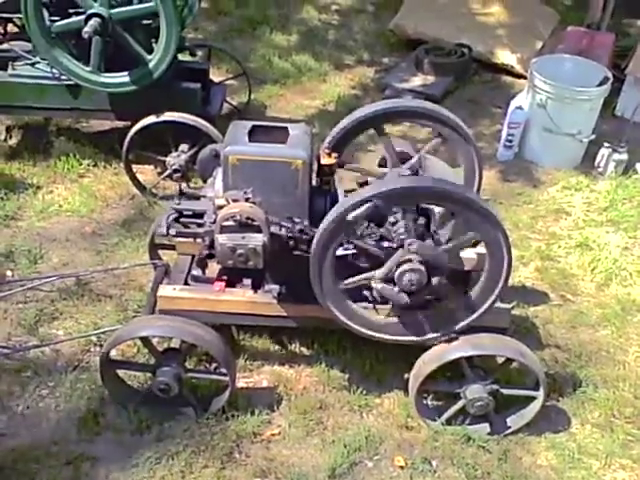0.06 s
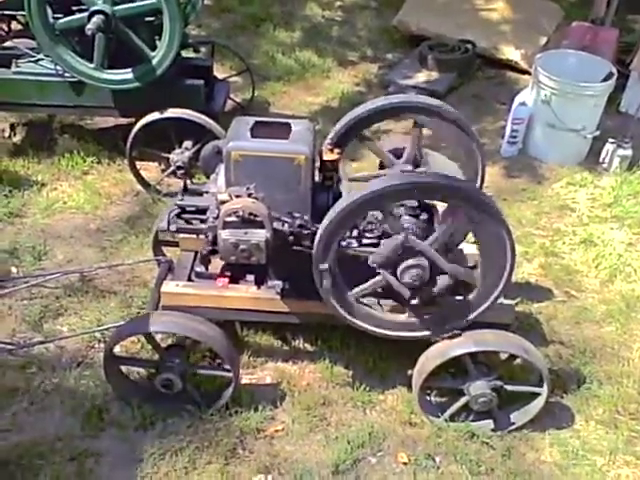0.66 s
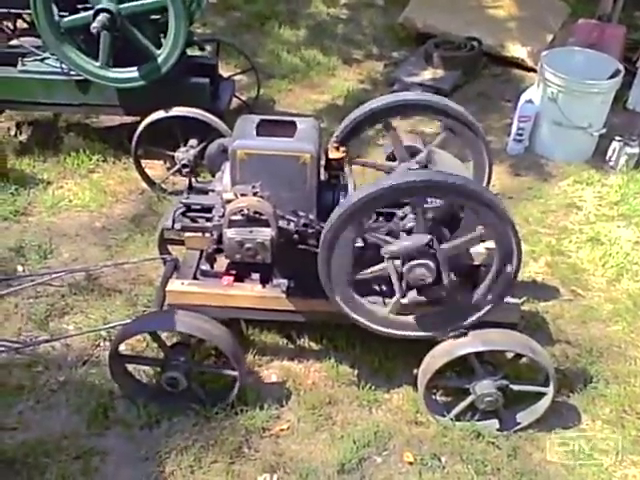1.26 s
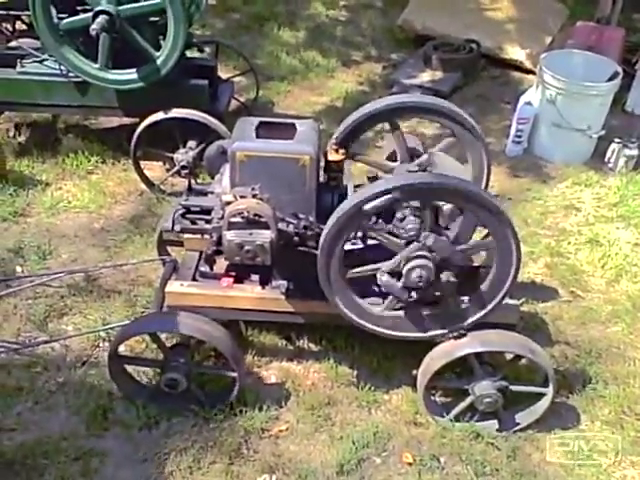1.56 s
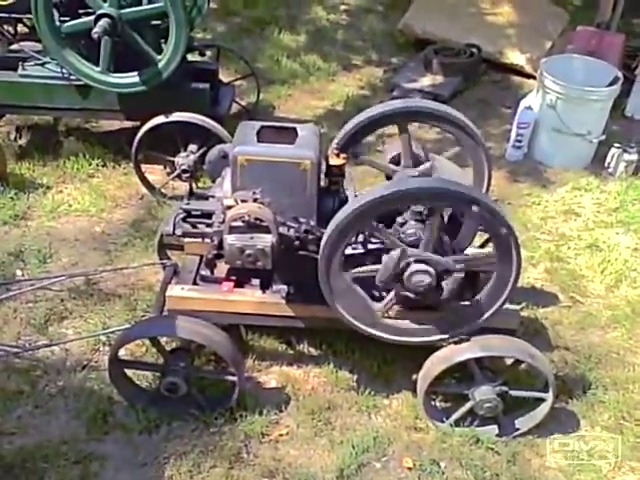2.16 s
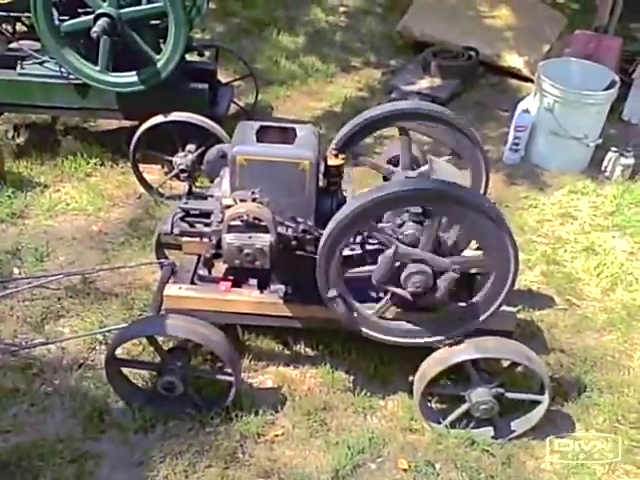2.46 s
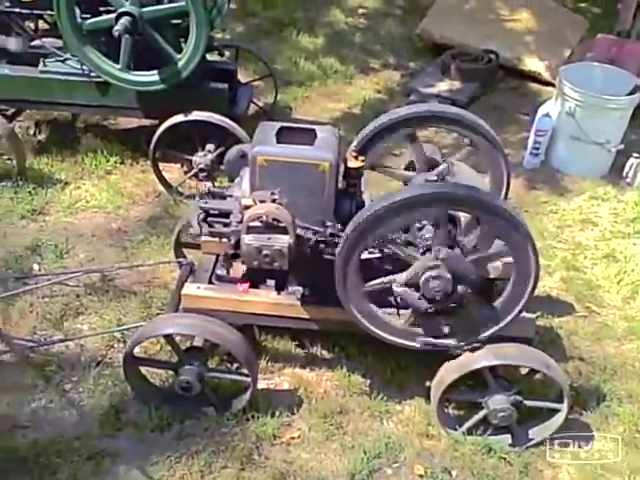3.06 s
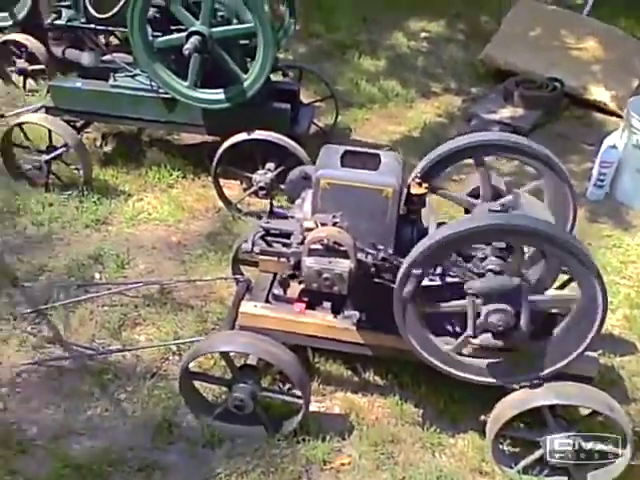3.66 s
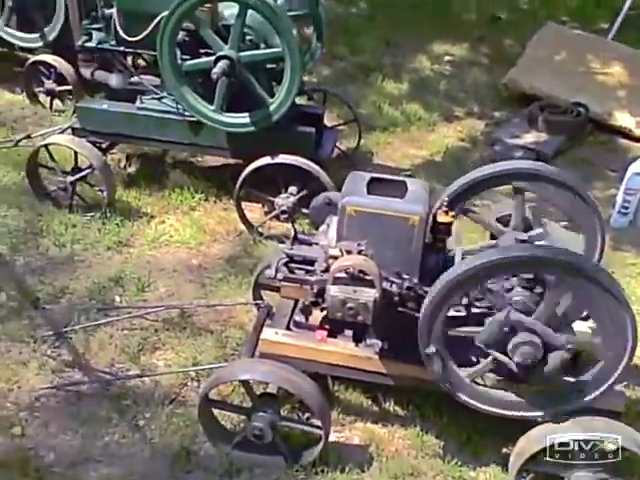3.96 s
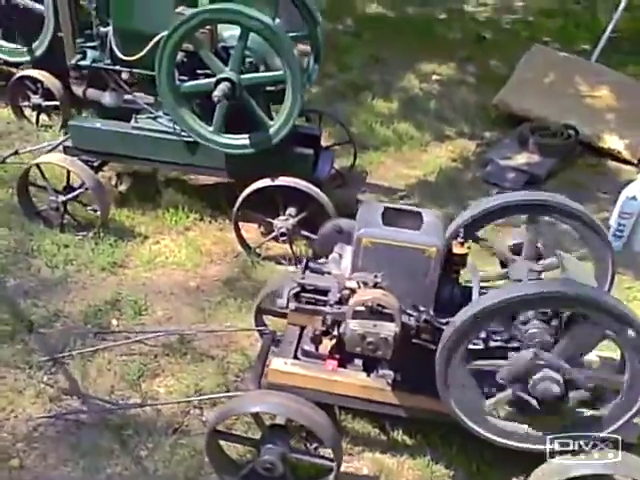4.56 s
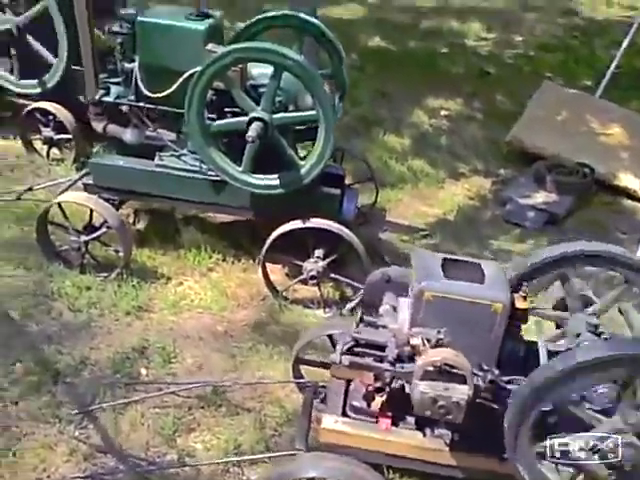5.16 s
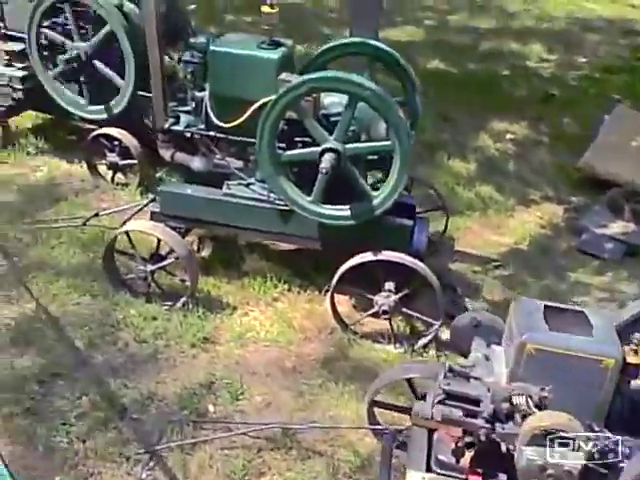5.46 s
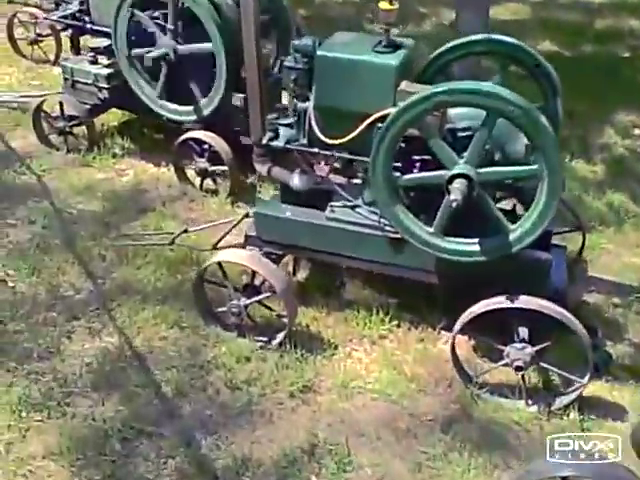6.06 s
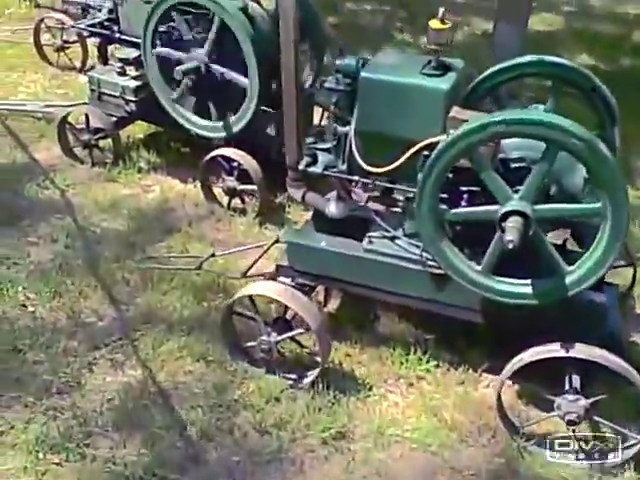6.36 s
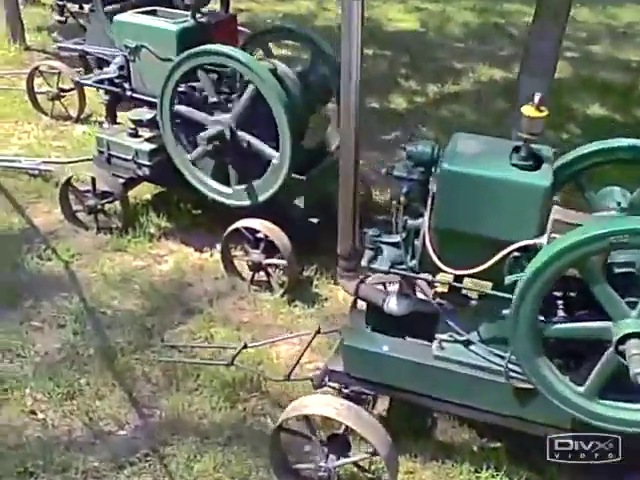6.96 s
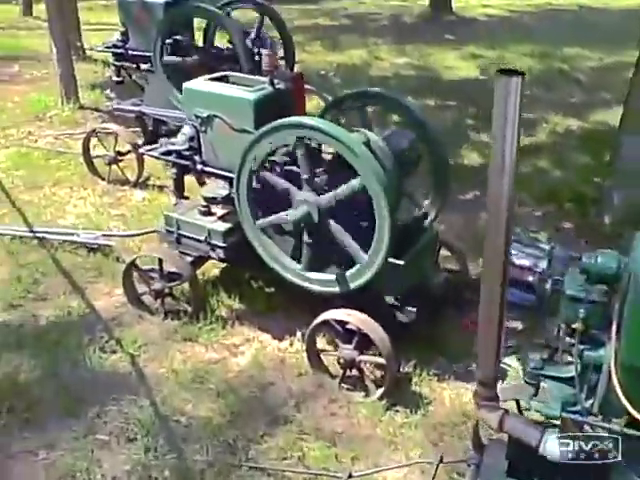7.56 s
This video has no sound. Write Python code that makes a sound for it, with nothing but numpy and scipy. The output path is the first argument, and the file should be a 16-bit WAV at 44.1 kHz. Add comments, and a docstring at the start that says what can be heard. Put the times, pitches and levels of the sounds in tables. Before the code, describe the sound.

Rapid exhaust popping from an antique gas engine runs on with brief hitches, among occasional deep chuffs and clacking iron parts.

```python
"""Antique gas engines at a show.

A fast engine fires 13 times a second, each pulse of gas exciting the resonances of a small muffler,
in runs that its governor mostly ends with a few weak firings. Slow hit-and-miss engines chuff between
the pops, their valves hiss and their gear clacks. More engines rumble behind; once a sharp click sounds."""
import sys
import numpy as np
from scipy import signal
from scipy.fft import rfft, irfft, next_fast_len
from scipy.io import wavfile
from scipy.ndimage import map_coordinates

SR = 44100
rng = np.random.default_rng(int(sys.argv[2]) if len(sys.argv) > 2 else 0)


def master(y):
    """Save y as 16-bit WAV."""
    cut = np.clip(np.atleast_2d(y).T, -1, 1)
    pcm = np.round(cut * 32767)  # scale
    wavfile.write(sys.argv[1], SR, pcm.astype(np.int16))


N = 344862
EVENT_T = np.arange(int(.09 * SR)) / SR  # time axis of one transient, t/s
CLICK_S = 4.1522

# firings of the slow engines: t/s, thump level/dB, puff level/dB, intake lead/s, intake level/dB
CHUFFS = [(0.43, -26.5, -35.5, 0.16, -35), (0.853, -17, -22, 0.16, -33), (3.191, -25, -43.5, .18, -40),
          (3.406, -18, -22, .175, -30.5), (3.64, -18, -24.5, .163, -33), (5.760, -27, -35, 0.19, -49),
          (6.266, -22.5, -29, .084, -31), (6.604, -18.5, -21.5, .168, -35)]
# mid-range spectrum of machinery noise: f/Hz, level/dB
DIN_SPECTRUM = [(130, -36), (260, -9), (350, -2), (393, 0.5), (450, -2), (670, 0.5), (1020, -2),
                (1240, 2.5), (1500, -0.5), (1750, -11.5), (2400, -14.5), (4000, -54.5)]
# treble spectrum of machinery noise: f/Hz, level/dB
HISS_SPECTRUM = [(1000, -47.5), (1900, -8.5), (2600, 0.5), (3000, -2), (3220, 1), (3400, 1.5), (3650, 5),
                 (4050, -3.5), (4500, -4.5), (4800, -7), (5100, -5), (5500, -13), (6500, -13.5)]


def fast_engine():
    """Source and filter: each exhaust pulse is a shock, a gas slug and a jet, ringing pipe and muffler."""
    # the listener's path: t/s, lag of the ground reflection/s, turn (0 muffler's face, 1 its side)
    stance = [(0, 0.002257, 0), (3.801, 0.002257, 0.069), (4.8, 0.002257, 0.31), (5.5, 0.0021, 0.49),
              (6.0, .00202, 0.81), (6.5, .0019, 0.6), (7.0, .00172, 0.8), (7.8, .00168, 0.8)]
    # the pipe's ring, fading as the listener walks away: t/s, level/dB
    pipe_levels = [(0, -18), (3.9, -17.5), (4.9, -18.4), (5.6, -20), (6.5, -22.5), (7.1, -25), (7.8, -30)]
    # the muffler's two lowest shell modes: f/Hz, bandwidth/Hz, gain/dB
    shell_modes = [(793, 21, -1.5), (949, 27, -5.5)]
    out = np.zeros(N)
    for t, db, throttle_db, rasp_db, hardness_db, bark_hz in firings():
        lag, turn = at(stance, t)
        ring_db = at(pipe_levels, t)[0] + db - throttle_db
        bark_db = hardness_db + db - throttle_db
        # throttling weakens the thump least and the rasp most
        thump = amp(db - 21.5 - .4 * throttle_db) * gas_slug(centre_s=.0054, width_s=.0022)
        pipe = pipe_ring(start_hz=151.3, end_hz=737.5, glide_s=.023, peak_s=.0092, sharp=7.8)
        ring = amp(ring_db - .5) * burst(ground_echo(pipe, lag, share=.57 * turn))
        shock = valve_crack(hz=980, t60=.0027)
        crack = amp(bark_db - 7) * burst(ground_echo(shock, lag, share=.4))
        bark = amp(bark_db - .5) * muffler_bark(bark_hz, lag, turn)
        shell = amp(bark_db - 16) * (1 - turn) * burst(resonate(crack, shell_modes))
        rasp = amp(rasp_db + db - 1.48 * throttle_db) * jet_rasp(lag, turn)
        unbroken = (t > CLICK_S) | (t + EVENT_T < CLICK_S)  # the pop under way breaks off at the click
        add(out, t, unbroken * (thump + ring + crack + bark + shell + rasp))
    return out


def firings():
    """Cycle-to-cycle variation: a run of uneven pops quickens throughout and mostly ends in weaker ones."""
    # runs: t/s, full firings, throttled firings, period offset/s, level/dB, rasp level/dB,
    # loss per throttled firing/dB, bark level/dB, bark f/Hz
    runs = [(0.0132, 9, 1, -.00015, 0.24, -25, 10.5, -18, 1334),
            (0.7714, 2, 1, -0.00011, 0, -30, 3.5, -19.5, 1296),
            (1.0023, 5, 1, -0.00035, -1, -26.5, 6, -18.5, 1354),
            (1.4616, 7, 4, 0.00032, 0.13, -24.5, 4, -18.5, 1253),
            (2.3043, 7, 1, 0.0013, 0.9, -25, 4.5, -19.5, 1333),
            (2.919, 5, 1, -.0005, -0.14, -28.5, 10.5, -18, 1356),
            (3.3762, 1, 1, -.001, -2.5, -32.5, 8.5, -22, 1190),
            (3.5299, 9, 0, .0009, 0, -26.5, 0, -18, 1440),
            (4.1987, 1, 3, -0.00098, -2, -27.5, 3, -18.5, 1520),
            (4.5064, 8, 3, .00005, -0.47, -28.5, 4.5, -19.5, 1520),
            (5.3471, 10, 2, 0.00081, -0.5, -28, 5, -20, 1420),
            (6.4238, 7, 1, -0.000084, -0.5, -24, 15, -20, 1150),
            (7.0329, 1, 2, -.0002, 0.5, -25, 14.5, -23, 1400),
            (7.2657, 8, 0, 0.0017, 0, -24.5, 0, -23, 1340)]
    period_s, speedup_s = .077, .00035  # each firing shortens the period
    for start, full, throttled, offset_s, db, rasp_db, loss_db, bark_db, bark_hz in runs:
        for k in range(round(full) + round(throttled)):
            t = start + k * (period_s + offset_s) - speedup_s * k * (k - 1) / 2
            throttle_db = loss_db * max(k + 1 - round(full), 0)
            kick = np.exp(-k / 2.3)  # a run opens on a full charge
            charge, turbulence, hardness, heat = rng.standard_normal(4)
            yield (t, db + .54 * charge, throttle_db,
                   rasp_db + 5.5 * kick + 1.6 * turbulence,
                   bark_db + kick + .75 * hardness,
                   bark_hz * np.exp(.06 * heat))


def gas_slug(centre_s, width_s):
    """Monopole radiation: a slug of gas sends out a pressure hump between two dips."""
    u = (EVENT_T - centre_s) / width_s
    return burst((1 - u * u) * np.exp(-u * u / 2))


def pipe_ring(start_hz, end_hz, glide_s, peak_s, sharp):
    """Air-column resonance: the pipe's lowest mode climbs as the flow dies down."""
    glide = end_hz - (end_hz - start_hz) * np.exp(-EVENT_T / glide_s)
    hz = glide * (1 + .03 * rng.standard_normal())
    return burst(np.sin(2 * np.pi * np.cumsum(hz) / SR) * swell(peak_s, sharp))


def valve_crack(hz, t60):
    """Sudden pressure release: a damped shock as the exhaust valve leaves its seat."""
    return burst(-np.sin(2 * np.pi * hz * EVENT_T) * amp(-60 * EVENT_T / t60))


def muffler_bark(bark_hz, lag, turn):
    """Forced resonance: turbulent flow drives the muffler's modes."""
    # the muffler's response: f/Hz, face level/dB, side level/dB
    response = [(300, -44, -23.5), (457, -4.5, -4), (610, -14.5, -0.5), (726, -1.5, -13), (911, -6, 9),
                (973, -20.5, 3), (1124, 7.5, -1.5), (1288, -6, 2), (1386, 0, -1), (1577, 5, -2.5),
                (1647, -19, -2.5), (2060, -20, -2.5), (2930, -50.5, -56)]
    flow = jet(peak_s=.0025, rise_s=.0011, decay_s=.0021) * rng.standard_normal(len(EVENT_T))
    # heard from the face, the strongest mode shifts with the heat of the gas
    mode_db = 7 + 1.5 * rng.standard_normal()
    flow += (1 - turn) * resonate(flow, [(bark_hz, 190, mode_db)])
    bark = coloured(flow, heard_from(response, turn))
    return burst(ground_echo(bark, lag, share=.63))


def jet_rasp(lag, turn):
    """Jet noise: the fastest turbulence radiates treble straight from the outlet."""
    # the jet's spectrum: f/Hz, face level/dB, side level/dB
    spectrum = [(1100, -22.5, -39), (2010, -2, 2), (2010, -5, -3.5), (2290, -1.5, -2), (2620, 4, -1.5),
                (2900, -2.5, -2), (3260, 4, 1.5), (3610, 1, 1), (4050, -8, -2.5), (4540, -6.5, -17.5),
                (4780, -5, -12.5), (5580, -13.5, -14), (6240, -15, -14)]
    spray = jet(peak_s=.0026, rise_s=.00045, decay_s=.0043) * rng.standard_normal(len(EVENT_T))
    rasp = coloured(spray, heard_from(spectrum, turn ** 2))
    return burst(ground_echo(rasp, lag, share=.063))


def slow_engines():
    """Pulse length sets pitch: a big slow cylinder lets out a longer, deeper slug and a soft puff."""
    # the escaping gas: f/Hz, level/dB
    puff_spectrum = [(150, -28.5), (400, -3), (560, -4), (700, 3.5), (800, -10.5), (900, -1), (1050, -2.5),
                     (1400, -6), (2000, -16.5), (3600, -8), (5500, -22.5)]
    out = np.zeros(N)
    onset = 1 - np.exp(-EVENT_T / .00034)
    for t, thump_db, puff_db, _, _ in CHUFFS:
        thump = amp(thump_db + 1.5) * gas_slug(centre_s=.0105, width_s=.0055) * onset
        puff = burst(jet(peak_s=.009, rise_s=.024, decay_s=.011) * noise(puff_spectrum, len(EVENT_T)))
        crack = amp(-5) * valve_crack(hz=440, t60=.012)
        add(out, t, thump + amp(puff_db) * (puff + exhaust_ring() + crack))
    return out


def exhaust_ring():
    """Free decay: a slow engine's exhaust rings on after a chuff."""
    # exhaust resonance: f/Hz, t60/s, level/dB
    modes = [(800, .06, -3.5)]
    onset = 1 - np.exp(-EVENT_T / .004)
    return sum(amp(db) * burst(np.sin(2 * np.pi * hz * EVENT_T) * amp(-60 * EVENT_T / t60) * onset)
               for hz, t60, db in modes)


def valves():
    """Turbulence at a constriction: air rushes through valves, before each chuff and at other times."""
    # other rushes of air: t/s (each rush opens half a length earlier and peaks half a length later), nominal
    # length/s, body level/dB, hiss level/dB
    rushes = [(0.173, 0.049, -30.5, -33.5), (0.426, 0.042, -28, -27), (0.787, 0.065, -48, -39.5),
              (1.103, 0.035, -28, -41), (1.792, 0.015, -31.5, -37.5), (2.228, 0.027, -26, -33.5),
              (3.089, 0.025, -40, -32), (3.187, 0.035, -46, -24.5), (3.355, 0.021, -40, -30.5),
              (5.924, 0.044, -34, -30), (6.265, 0.05, -33, -26.5), (6.304, 0.05, -45, -39),
              (7.077, 0.02, -29, -48.5)]
    # a valve's hiss: f/Hz, level/dB
    spectrum = [(1300, -42.5), (2100, -7.5), (2800, -4.5), (3250, -5.5), (3650, 3.5), (4100, -3),
                (4450, -3.5), (5200, -12.5), (6500, -18.5)]
    intakes = [(t - lead, .044, db - .5, db) for t, _, _, lead, db in CHUFFS]
    out = np.zeros(N)
    for t, length, body_db, hiss_db in intakes + list(rushes):
        u = np.arange(int(2 * length * SR)) / (length * SR)
        opening = np.exp(-np.abs((u - 1) / .42) ** 3)
        body = amp(body_db - 2) * noise(DIN_SPECTRUM, len(u))
        hiss = amp(hiss_db - 1.5) * noise(spectrum, len(u))
        add(out, t - length / 2, opening * (body + hiss))
    return out


def gear():
    """Friction slows the coasting flywheels, so push rods clack later and softer; loose parts knock."""
    # coasting spells: t/s, clacks, first period/s, lengthening per cycle/s, level/dB
    coasts = [(1.069, 9, .2165, .0034, -25), (4.042, 9, .2105, .0042, -24), (6.82, 2, .213, .0035, -24)]
    fade_db, loose_per_s = .16, 7
    out = np.zeros(N)
    for start, clacks, period, slowing, db in coasts:
        for k in range(round(clacks)):
            t = start + k * period + slowing * k * (k - 1) / 2
            force = amp(db - fade_db * k + 1.4 * rng.standard_normal())
            add(out, t, force * clack())
    for k in range(round(loose_per_s * N / SR)):
        t = (k + rng.random()) / loose_per_s
        add(out, t, amp(-36 + 2.5 * rng.standard_normal()) * clack())
    return out


def clack():
    """Damped impact: oily iron parts meet with a short rattling knock and a bright tick."""
    knock = swell(peak_s=.0034, sharp=.65) * noise(DIN_SPECTRUM, len(EVENT_T))
    tick = jet(peak_s=.003, rise_s=.0015, decay_s=.0093) * noise(HISS_SPECTRUM, len(EVENT_T))
    return amp(-4) * burst(knock) + amp(-8.5) * burst(tick)


def loose_metal():
    """Random excitation: shaken metal sings faintly, on and off, in one narrow mode."""
    # spells of ringing: t/s, length/s, f/Hz, level/dB
    rings = [(0.921, 0.65, 4590, -58), (6.187, 0.034, 4350, -39), (7.783, 0.03, 5100, -49)]
    out = np.zeros(N)
    for t, length, hz, db in rings:
        size = int(length * SR)
        mode = [(hz, 60, 0)]
        tone = unit(resonate(resonate(rng.standard_normal(size), mode), mode))
        shaking = amp(5 * wobble(18)[:size])
        add(out, t, amp(db) * unit(tone * shaking) * signal.windows.tukey(size))
    return out


def echoes(x, delay_s):
    """Scattering: each stretch of sound meets new reflections as the listener moves."""
    # reverberation among trees and machines: f/Hz, t60/s
    decay_times = [(100, 0.32), (400, 0.072), (1300, 0.16), (5000, 0.15)]
    out, size = np.zeros(N), 8192
    for start in range(0, N, size):
        hz, t, spectra = signal.stft(rng.standard_normal(SR // 3), SR, nperseg=256)
        decay = amp(-60 * t / along(decay_times, hz)[:, None])
        tail = signal.istft(spectra * decay, SR, nperseg=256)[1]
        tail /= np.linalg.norm(tail)
        add(out, start / SR + delay_s, signal.fftconvolve(x[start:start + size], tail))
    return out


def distant_engines():
    """Incoherent addition: engines further off merge into an uneven rumble, din and hiss."""
    # the background's course: t/s, rumble level/dB, din level/dB, hiss level/dB
    levels = [(0, -36, -35.5, -42), (1.0, -36, -34.5, -41.5), (1.6, -37, -36.5, -45.5),
              (2.15, -34, -34.5, -43), (2.75, -38.5, -36.3, -44.5), (3.25, -33.5, -35, -40),
              (4.3, -36, -35.5, -43.5), (5.8, -37, -37, -44), (6.3, -36, -34, -40),
              (7.1, -38, -34.7, -42.3), (7.82, -39, -33, -42.5)]
    # distant exhausts: f/Hz, level/dB
    rumble_spectrum = [(15, -10.5), (30, -4), (45, -2), (56, 8), (72, -7), (110, -11.5), (170, -8.5),
                       (260, -11), (500, -62)]
    rumble_db, din_db, hiss_db = at(levels, np.arange(N) / SR)
    clatter = wobble(70)  # many small parts rattle at once
    rumble = amp(rumble_db + 1 + 2.2 * wobble(14)) * noise(rumble_spectrum, N)
    din = amp(din_db + 2.9 * clatter + .89 * wobble(25)) * noise(DIN_SPECTRUM, N)
    hiss = amp(hiss_db - 3.5 + 3.3 * clatter + 1.9 * wobble(30)) * noise(HISS_SPECTRUM, N)
    return rumble + din + hiss


def ground_echo(x, lag, share):
    """Interference with the ground reflection: a comb that climbs as the lag shrinks."""
    return filtered(x, lambda hz: 1 + share * np.exp(-2j * np.pi * hz * lag))


def heard_from(table, turn):
    """Directivity: the spectrum part-way between the face and the side."""
    hz, face_db, side_db = np.transpose(table)
    return np.c_[hz, face_db + np.clip(turn, 0, 1) * (side_db - face_db)]


def jet(peak_s, rise_s, decay_s):
    """Exponential growth and decay, as of the flow from a cylinder through an opening valve."""
    onset = 1 - np.exp(-EVENT_T * 2000)
    return onset * np.exp(np.minimum((EVENT_T - peak_s) / rise_s, (peak_s - EVENT_T) / decay_s))


def swell(peak_s, sharp):
    """A gamma envelope: it rises to 1 at peak_s and dies away."""
    u = EVENT_T / peak_s
    return (u * np.exp(1 - u)) ** sharp


def resonate(x, modes):
    """Second-order resonators in parallel: f/Hz, bandwidth/Hz, gain/dB."""
    return filtered(x, lambda f: sum(amp(db) * 1j * f * width / (hz * hz - f * f + 1j * f * width)
                                     for hz, width, db in modes))


def coloured(x, spectrum, size=8192):
    """Minimum-phase filtering by (f/Hz, level/dB) points: nothing sounds before its cause."""
    log_gain = np.log(amp(along(spectrum, np.fft.rfftfreq(size, 1 / SR))))
    cepstrum = irfft(log_gain)[:size // 2] * np.r_[1, np.full(size // 2 - 1, 2)]
    return irfft(rfft(x, size) * np.exp(rfft(cepstrum, size)))[:len(x)]


def filtered(x, response):
    """Linear filtering: the spectrum of x times a frequency response."""
    size = next_fast_len(len(x) + 4096)
    return irfft(rfft(x, size) * response(np.fft.rfftfreq(size, 1 / SR)), size)[:len(x)]


def noise(spectrum, size):
    """Spectrally shaped noise of rms 1."""
    return unit(filtered(rng.standard_normal(size), lambda hz: amp(along(spectrum, hz))))


def wobble(rate):
    """Random modulation: a smooth curve with rate knots a second."""
    knots = rng.standard_normal(int(N * rate / SR) + 4)
    return map_coordinates(knots, [np.arange(N) * rate / SR])


def amp(db):
    """Amplitude ratio of a level in dB."""
    return 10 ** (np.asarray(db) / 20)


def unit(x):
    """Power normalisation to rms 1."""
    return x / np.sqrt(np.mean(x ** 2) + 1e-20)


def burst(x):
    """Energy normalisation to that of 12 ms at rms 1."""
    return x / np.sqrt(np.sum(x ** 2) / (.012 * SR) + 1e-20)


def along(points, hz):
    """Interpolation of (f/Hz, value) points in log frequency."""
    f, values = np.transpose(points)
    return np.interp(np.log(hz + 1), np.log(f + 1), values)


def at(curve, t):
    """Interpolation of a curve's columns at time t."""
    times, *columns = np.transpose(curve)
    return [np.interp(t, times, column) for column in columns]


def add(track, t, x):
    """Superposition of x on the track from time t on."""
    start = max(round(t * SR), 0)
    part = track[start:start + len(x)]
    part += x[:len(part)]


def scene():
    """Superposition of the near engines, their echoes and the distant ones."""
    near = fast_engine() + slow_engines() + valves() + gear() + loose_metal()
    return (near + amp(-15) * echoes(near, delay_s=.008) + distant_engines())[None]


def record(dry):
    """Saturation and band limiting: the microphone stage rounds peaks and cuts treble; one click sounds."""
    ceiling, rolloff_hz, cutoff_hz, top_hz = .76, 5600, 6700, 15800
    sound = dry[0] / (1 + np.abs(dry[0] / ceiling) ** 4) ** (1 / 4)
    sound = filtered(sound, lambda hz: (hz < cutoff_hz) / np.sqrt(1 + (hz / rolloff_hz) ** 36))
    add(sound, CLICK_S, amp(-10) * np.exp(-EVENT_T / .0002))
    return filtered(sound, lambda hz: np.exp(-(hz / top_hz) ** 40))[None]


dry = scene()
out = record(dry)
master(out)
```